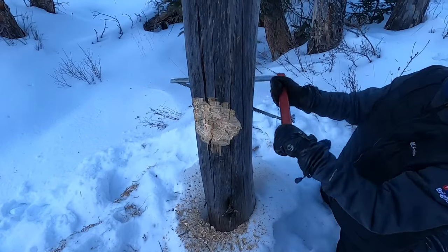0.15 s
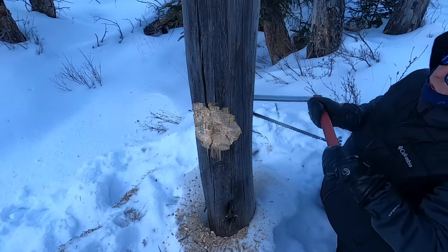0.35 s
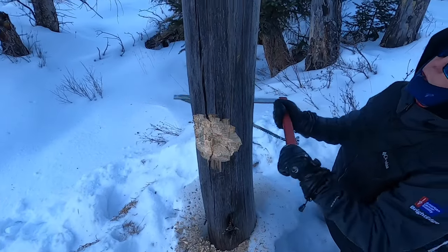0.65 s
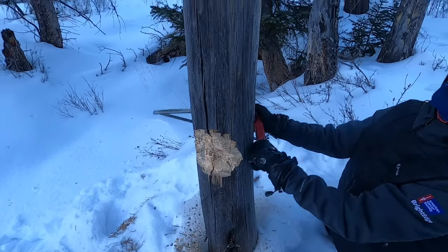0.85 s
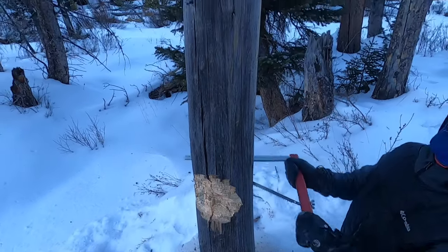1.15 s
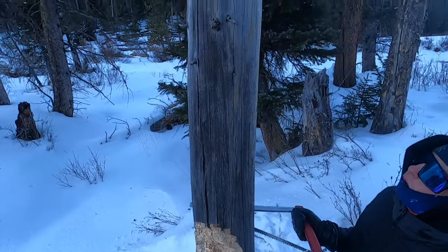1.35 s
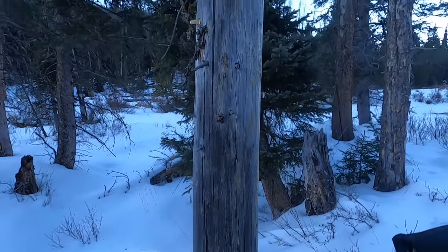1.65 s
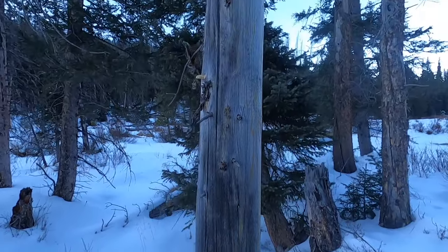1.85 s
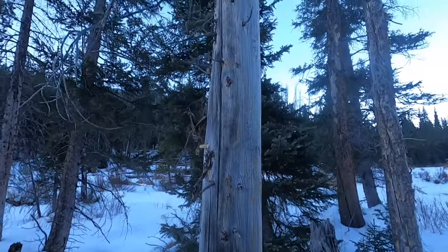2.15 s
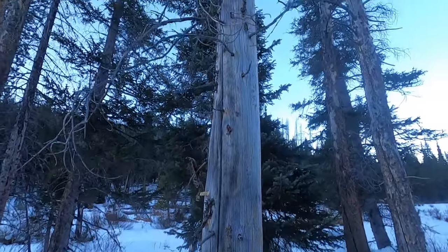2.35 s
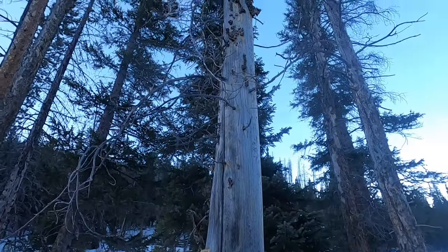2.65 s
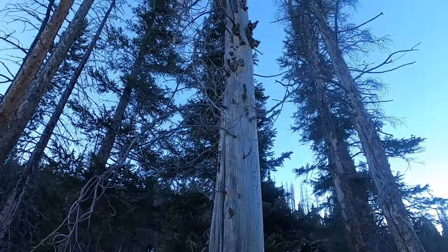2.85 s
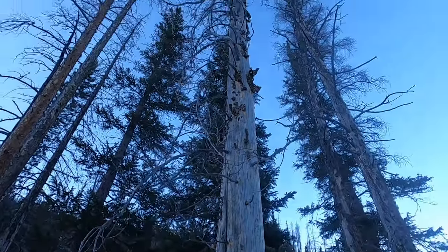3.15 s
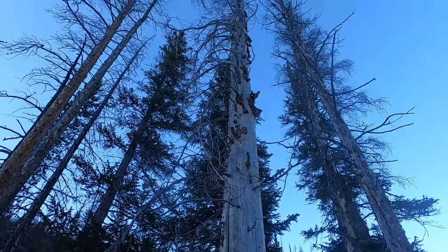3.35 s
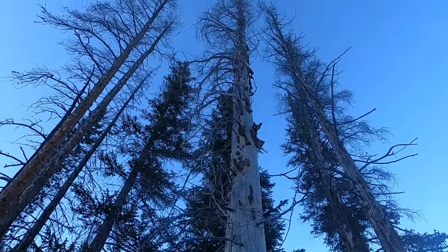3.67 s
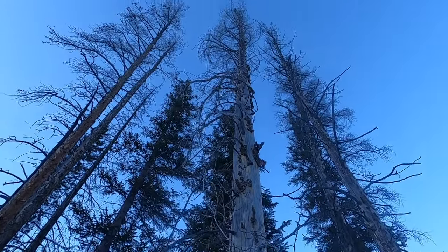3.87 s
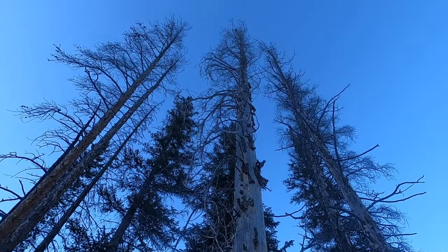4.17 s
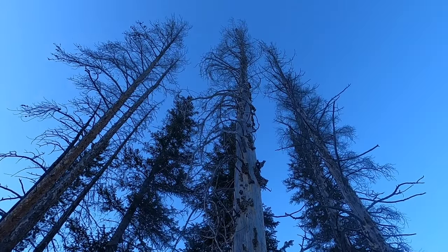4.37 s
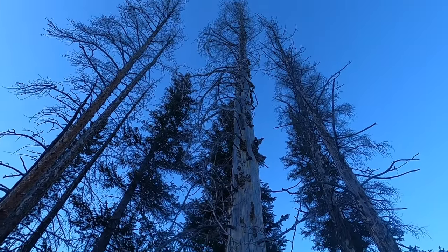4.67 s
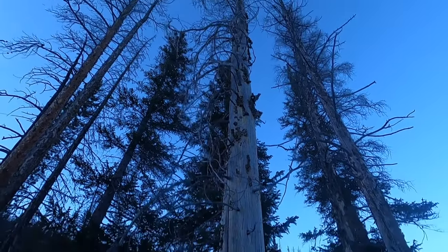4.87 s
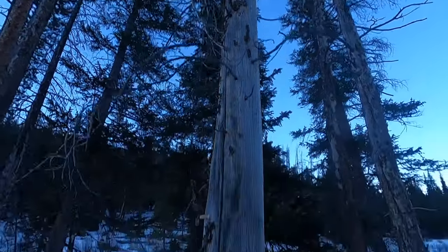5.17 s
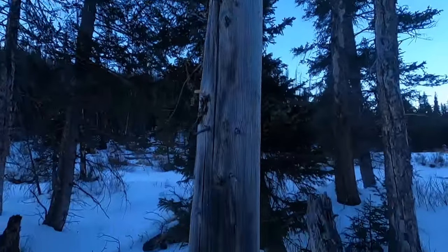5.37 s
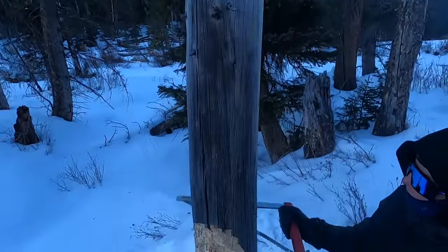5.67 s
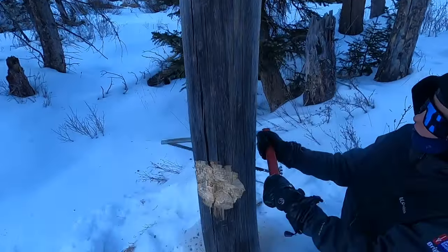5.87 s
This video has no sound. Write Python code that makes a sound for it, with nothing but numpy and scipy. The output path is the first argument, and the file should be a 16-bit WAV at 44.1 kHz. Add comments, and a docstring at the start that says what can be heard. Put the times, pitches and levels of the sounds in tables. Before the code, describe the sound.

Uneven back-and-forth sawing runs throughout, dry and gritty with a steely midrange edge. It is loudest in the first strokes, softer and duller through the middle, then strong again at the end. Short squeaks, splintering snaps, light ticks and trunk knocks break the rhythm. Close outdoor pickup, no obvious echo, faint forest noise and low rumble; nearly mono at first, then wider.

```python
"""A bow saw cuts a dry standing trunk in a quiet snowy forest, about two and a half strokes a second.
Close to the microphone, random fibre fractures make a dense rasp through resonances of blade, frame and trunk.
Chatter is noise around a pitch, the singing blade a wavering tone; snaps, knocks and ticks are noise bursts.
Behind lie low soft thumps of handling and trunk over a drifting rumble, and the forest's faint filtered noise.
The saw wanders across the stereo image, which starts almost mono and opens, top treble first."""
import sys
import numpy as np
from scipy import signal
from scipy.fft import rfft, irfft, next_fast_len
from scipy.io import wavfile
from scipy.ndimage import uniform_filter1d, map_coordinates

SR = 44100
rng = np.random.default_rng(int(sys.argv[2]) if len(sys.argv) > 2 else 0)


def waveform_to_disk(signal):
    """Save audio, clipped to [-1, 1], as 16-bit WAV at the path in sys.argv[1]."""
    frames = np.transpose(np.atleast_2d(signal))
    scaled = np.clip(frames, -1, 1) * 32767
    samples = np.round(scaled).astype(np.int16)
    wavfile.write(sys.argv[1], SR, samples)


N = 265219  # samples, about 6 s

# Pushes and pulls of the saw: start t/s, length/s, fastest moment/share of length,
# loss towards the slow ends/dB, rasp level/dB, bite, trunk and splinter hiss levels/dB re rasp,
# level of the idle scraping before it/dB
STROKES = [(0.099, 0.34, 0.58, 17, -33, -2.5, -13, -36, -58.5),
           (0.491, 0.46, 0.61, 19.5, -34.5, 0.5, -14.5, -20.5, -55.5),
           (1.037, 0.3, 0.59, 11, -40.0, 0.5, -21, -22.5, -61),
           (1.393, 0.35, 0.51, 14.5, -35.5, 0.5, -14.5, -23, -55.5),
           (1.826, 0.39, 0.5, 20.5, -39.5, 1, -11, -21.5, -52),
           (2.248, 0.36, 0.6, 8, -40.5, -1, -8, -22, -61),
           (2.678, 0.35, 0.46, 14.5, -43, -1.5, -5.5, -25.5, -59.5),
           (3.033, 0.39, 0.54, 19, -39, -0.5, -10, -27.0, -58),
           (3.477, 0.42, 0.48, 32, -39.5, -3, -9, -33, -63.5),
           (3.904, 0.47, 0.39, 13.5, -43.5, -4.5, -7.5, -36, -58),
           (4.378, 0.44, 0.48, 66, -41.5, -2, -12.5, -32, -68),
           (4.784, 0.33, 0.4, 6, -43.0, -1.0, -8, -28.5, -66.5),
           (5.186, 0.33, 0.54, 23.5, -40, 3.5, -16.5, -21.5, -58.5),
           (5.56, 0.38, 0.64, 12.5, -28, -2, -14.5, -25.5, -53)]
# The cut pinches the blade in mid-stroke: t/s, loss/dB, half length/s
STALLS = [(0.744, 15.68, 0.045), (1.602, 7.5, 0.023), (4.16, 9.5, 0.019), (5.792, 8.5, 0.086)]
# Spectra of rasp, keen bite, splinters and trunk: f/Hz, relative level/dB per Hz
RASP_SPECTRUM = [(500, -75), (900, -12.5), (1040, -7), (1130, 0), (1300, 2), (1500, 7), (2200, 2),
                 (2450, -20), (2900, -16), (4000, -66)]
BITE_SPECTRUM = [(1700, -56), (2200, 0), (2500, 2), (3000, -0.5), (3700, -3), (4800, -5), (5700, -14),
                 (6600, -7.5), (7600, -9), (8300, -29.5), (10000, -22), (13000, -66)]
SPLINTER_SPECTRUM = [(5000, 2), (8000, 12.5), (9300, 5), (10300, -1.5), (12500, 3), (15700, -17)]
TRUNK_SPECTRUM = [(40, -51), (90, -34), (125, -10), (155, 3.5), (210, 1.5), (320, 1.5), (410, -1.5),
                  (570, -0.5), (720, -6), (900, -12), (1200, -0.5), (2000, -49)]
# Resonances of the saw damped in the cut: f/Hz, width/Hz, relative level/dB
BLADE_MODES = [(1436, 30, -0.5), (1520, 117, 0), (1630, 46, -9), (1843, 24, 8), (2022, 36, 8.5),
               (2170, 26, 4), (2374, 28, 4)]
BLADE_HIGH_MODES = [(2560, 60, 11), (2700, 34, 21), (2915, 75, 17.5), (3157, 56, 15.5), (3340, 41, 15),
                    (3505, 70, 6), (4085, 47, 8), (4230, 68, -14), (6040, 58, -7), (6712, 65, -38.5),
                    (7140, 120, -32)]
FRAME_MODES = [(1138, 31, -0.72), (1150, 66, -1.5)]
# How well the steel radiates: f/Hz, level/dB
STEEL_RADIATION = [(800, 1), (1100, -8.5), (7600, -3.5), (9000, -10), (13000, -22.5)]
# The blade binds and chatters, in the steel (high) or against the trunk (low):
# t/s, f/Hz, level before trim/dB, half length/s
CHATTER = [(.32, 2120, -28, .012), (.84, 2360, -35.5, 0.033), (.986, 1570, -55, .022),
           (1.229, 2900, -29, .014), (1.267, 2780, -35.5, 0.0099), (1.651, 2650, -42, 0.012),
           (2.049, 2090, -39, .02), (2.36, 335, -48, 0.055), (2.487, 1490, -34, 0.013),
           (2.529, 282, -41, 0.035), (2.822, 1480, -43, 0.038), (3.62, 1490, -38, 0.0073),
           (3.698, 567, -44.5, .03), (3.824, 450, -44, 0.016), (4.105, 3660, -43, .009),
           (4.565, 1500, -38.5, 0.019), (4.602, 3360, -45.5, 0.027), (5.64, 3250, -32.5, 0.024),
           (5.696, 2690, -31, 0.029)]
# The taut blade is set singing: t/s, level/dB, swell/s, t60/s
TWANGS = [(0.0, -53, .01, .17), (.39, -44, .02, .2), (.61, -46, .07, .3), (.9, -48, .05, .2),
          (1.54, -45, .015, .2), (2.56, -55, .03, .2), (2.93, -47.5, .045, .6), (3.16, -48.5, .07, .45),
          (4.3, -58, .04, .2), (4.655, -47, .03, .5), (4.96, -50, .03, .3), (5.87, -50, .04, .3)]
# Sharp snaps where a tooth catches: t/s, level before trim/dB, treble level before trim/dB re the first
SNAPS = [(0.0316, -33.5, -37), (0.2705, -29, -32), (0.2876, -28, -29), (0.3117, -34, -32),
         (0.6318, -31, -8), (0.8423, -48, -29), (1.35, -40.5, -34), (1.5064, -39, -34),
         (1.6529, -22, -12.5), (3.6153, -27, -38), (3.9, -40.5, -35), (4.102, -32, -34), (4.1677, -37, -20),
         (5.7014, -48, -28)]
# Dull knocks against the trunk: t/s, level before trim/dB, thump level before trim/dB re the first
KNOCKS = [(0.383, -41.5, 1), (0.923, -37, -2), (1.512, -39, -12), (1.574, -30.5, -1.5), (1.751, -44, -6),
          (1.789, -33, -29), (2.648, -33.5, -21), (3.369, -35.5, -17), (3.813, -32, -16), (4.118, -29, -15),
          (5.059, -46.5, 5.5), (5.124, -46.5, 2.5), (5.774, -22.5, -11), (5.818, -34.5, 1)]
# Spectra of snap, knock, thump and light blade ticks: f/Hz, relative level/dB per Hz
SNAP_SPECTRUM = [(200, 5), (900, 8.5), (1200, 5), (2000, 7.5), (3500, 8), (6000, -14), (12000, -65)]
KNOCK_SPECTRUM = [(100, -32), (350, 6), (520, 7.5), (750, -7), (1200, 8), (1700, 5), (2500, -28),
                  (6000, -19), (15000, -65)]
THUMP_SPECTRUM = [(30, -25), (70, -30), (110, 7.5), (170, 13), (330, -0.5), (520, -8), (1200, -40),
                  (4000, -70)]
RATTLE_SPECTRUM = [(100, -25), (400, -8), (800, -12), (1400, 0), (2200, -4), (4000, -14), (7500, -26),
                   (14000, -60)]
# Low soft thumps of handling and of the trunk, many at stroke ends:
# t/s, level before trim/dB, half length/s
SOFT_THUMPS = [(0.385, -49, .025), (0.923, -49.5, 0.045), (1.54, -42, 0.041), (1.75, -59, 0.034),
               (2.88, -64, 0.035), (3.403, -51, 0.034), (5.416, -47.5, 0.13), (5.822, -55, 0.075)]
# Spectra of the low rumble with its thumps, and of the forest: f/Hz, relative level/dB per Hz
RUMBLE_SPECTRUM = [(15, -6), (30, 0.5), (50, -9), (75, -17.5), (120, -21), (400, -51.5)]
FOREST_SPECTRUM = [(25, -21), (60, -22), (100, -21), (180, 6), (500, -9), (1500, -27), (4000, -8),
                   (7500, -16.5), (9000, -33), (15500, -43)]
# How the saw faces the microphone: t/s, frame level before trim/dB, left-right level/dB, lag of left/ms
FACING = [(0, 1.5, -7, 0), (.9, 1.5, -2, 0.0098), (1.3, -9, -6, 0.0048), (2, -12, 7.5, 0),
          (2.7, -6, 4.5, 0), (3.7, -10, -1.5, 0.025), (4.9, -13, 0.5, 0.013), (5.25, -6, -2, 0.028),
          (5.8, -5.5, -3, 0.037)]
# Likeness of left and right before panning: f/Hz, correlation
LIKENESS = [(100, 1), (1200, 0.91), (2200, 0.91), (4300, 0.89), (5600, 0.65), (7500, 0.17), (10000, 0.18),
            (14000, 0.031)]
# Lean of the treble, to the right at the top: f/Hz, left-right level/dB
TREBLE_LEAN = [(1500, 2), (3000, 4.1), (7000, -0.5), (10500, 0), (13000, -4.5)]
# Width of the stereo image: t/s, share of the side signal below the split, share above it
STEREO_WIDTH = [(0, 0.0033, 0), (.4, 0.0067, 0), (.52, 0.0067, 0.78), (2.5, 0.017, 1), (2.7, 0.17, 0.66),
                (3.2, 0.25, 0.81), (3.5, 0.62, 0.79), (6, 1, 0.9)]

GRIP_S, RELEASE_S = 0.079, 0.062  # the teeth take hold and let go
TRUNK_POWER = 0.79  # the trunk follows this power of the stroke's force
IDLE_BITE_DB, IDLE_TRUNK_DB, IDLE_HISS_DB = -5, -3, -23.5  # re the idle rasp
PATCHY_DB = 2.6  # rms depth of the passing resonances
CALM_DB, DRIFT_DB = -67, 6.5  # rumble between thumps before trim, and the scale of its drift
SPLIT_HZ, TOP_HZ = 11700, 15730  # split of the stereo width, and the upper band limit


def sawing(blade_db=-4, high_db=-5.5, frame_db=-8.0, rasp_db=-3.5, bite_db=-1, trunk_db=0.5,
           hiss_db=5.5, judder_db=0.05, drum_db=0.6):
    """The teeth tear fibres; blade, frame and trunk each answer with their own resonances."""
    rasp_gain, bite_gain, trunk_gain, hiss_gain = strokes()
    facing_frame_db, _, _ = curves(FACING)
    # teeth catch and break free unevenly
    snags = 1 + .55 * catches(rate=80, t60=.013, scatter_db=2)
    judder = unit(snags * amp(judder_db * wobble(330)))

    coarse = fibres(rate=10000, scatter_db=1.0)
    keen = fibres(rate=16000, scatter_db=0.0)
    steel = fibres(rate=12000, scatter_db=4.0)
    # two passes give the frame's ring a firm lower edge
    frame = resonated(resonated(steel, FRAME_MODES), FRAME_MODES)

    rasp = amp(rasp_db) * coloured(coarse, RASP_SPECTRUM)
    rasp = rasp + amp(blade_db) * resonated(steel, BLADE_MODES)
    rasp = rasp + amp(frame_db + facing_frame_db) * frame
    bite = amp(bite_db) * coloured(keen, BITE_SPECTRUM)
    bite = bite + amp(high_db) * resonated(steel, BLADE_HIGH_MODES)
    wood = coloured(fibres(rate=4000, scatter_db=0.0), TRUNK_SPECTRUM)
    drumming = amp(trunk_db) * unit(wood * amp(drum_db * wobble(70)))
    splinters = amp(hiss_db) * coloured(fibres(rate=18000, scatter_db=2.0), SPLINTER_SPECTRUM)
    return judder * (rasp_gain * rasp + bite_gain * bite + trunk_gain * drumming + hiss_gain * splinters)


def strokes(unsteady_db=1.0):
    """Gains of rasp, bite, trunk and hiss: teeth grip, swell with speed and let go, over idle scraping."""
    t = np.arange(N) / SR
    free = amp(-sum(db * swell(s, half) for s, db, half in STALLS))
    gains = np.zeros((4, N))
    for start, length, fastest, sag_db, db, bite_db, trunk_db, hiss_db, _ in STROKES:
        now = (t > start) & (t < start + length)
        age = t[now] - start
        slowness = np.interp(age, [0, fastest * length, length], [1, 0, 1]) ** 2
        grip = np.minimum(age / GRIP_S, 1)
        release = np.minimum((length - age) / RELEASE_S, 1)
        force = grip * release * amp(-sag_db * slowness)
        teeth = free[now] * force
        trunk = amp(trunk_db) * np.abs(force) ** TRUNK_POWER
        gains[:, now] += amp(db) * np.array([teeth, amp(bite_db) * teeth, trunk, amp(hiss_db) * teeth])
    starts, *_, idle_db = np.transpose(STROKES)
    idle_colour = amp([0, IDLE_BITE_DB, IDLE_TRUNK_DB, IDLE_HISS_DB])
    idle = np.outer(idle_colour, amp(np.interp(t, starts, idle_db)))
    return np.hypot(gains, idle) * amp(unsteady_db * wobble(30))


def fibres(rate, scatter_db):
    """Tiny fractures, rate a second, of random size; narrow resonances pass as the blade slides."""
    happens = rng.random((2, N)) < rate / SR
    size = rng.standard_normal((2, N)) * amp(scatter_db * rng.standard_normal((2, N)))
    z = signal.stft(happens * size, nperseg=2048)[2]
    # random gains smoothed over frequency, then over time
    field = uniform_filter1d(rng.standard_normal(z.shape[1:]), size=3, axis=0)
    field = uniform_filter1d(field, size=7, axis=1)
    patchy = signal.istft(z * amp(PATCHY_DB * unit(field)), nperseg=2048)[1]
    return unit(patchy[:, :N])


def catches(rate, t60, scatter_db):
    """Brief surges at random moments as single teeth snag and tear free; each peaks near 1."""
    size = amp(scatter_db * np.clip(rng.standard_normal(N), -2, 2))
    kicks = (rng.random(N) < rate / SR) * size
    t = np.arange(SR // 20) / SR
    fall = amp(-60 * t / t60) * np.minimum(t / .0003, 1)
    return signal.fftconvolve(kicks, fall)[:N]


def chatter(level_db=-2):
    """Stick and slip, drawn as noise around one rough pitch that swells and fades."""
    t = np.arange(N) / SR
    out = np.zeros(N)
    for s, hz, db, half in CHATTER:
        near = np.abs(t - s) < 3 * half
        width = 70 + .045 * hz  # Hz either side of the pitch
        band = signal.butter(N=2, Wn=[hz - width, hz + width], btype="band", fs=SR, output="sos")
        scrape = unit(signal.sosfilt(band, rng.standard_normal(near.sum())))
        out[near] += amp(db + level_db) * swell(s, half)[near] * scrape
    return out


def singing(note_hz=1841):
    """The taut blade swells on one note and rings on; the cut makes it waver."""
    t = np.arange(N) / SR
    notes = []
    for s, db, rise, t60 in TWANGS:
        ring = amp(-60 * np.abs(t - s) / t60)
        notes.append(amp(db) * np.where(t < s, swell(s, rise), ring))
    pitch_hz = note_hz + 4.5 * wobble(9)
    phase = 2 * np.pi * np.cumsum(pitch_hz) / SR + .42 * wobble(60)
    tone = unit(np.sin(phase) * amp(2.2 * wobble(45)))
    return np.linalg.norm(notes, axis=0) * tone


def snaps(snap_db=-7, tick_db=-1):
    """A tooth catches and breaks off a larger splinter: a snap with a treble tick."""
    s, db, treble = np.transpose(SNAPS)
    body = blows(s, db + snap_db, SNAP_SPECTRUM, t60=.02)
    return body + blows(s, db + treble + tick_db, SPLINTER_SPECTRUM, t60=.02)


def knocks(knock_db=-9, thump_db=-2):
    """The saw jolts in the cut and thumps the trunk, whose bass dies more slowly."""
    s, db, low = np.transpose(KNOCKS)
    knock = blows(s, db + knock_db, KNOCK_SPECTRUM, t60=0.029)
    return knock + blows(s, db + low + thump_db, THUMP_SPECTRUM, t60=0.11)


def blows(times, levels_db, spectrum, t60, onset=0.0038):
    """Noise bursts: each rises over a few milliseconds (onset, s), then dies away at once."""
    t = np.arange(SR // 4) / SR
    burst = amp(-60 * np.maximum(t - onset, 0) / t60) * np.minimum(t / onset, 1) ** 2
    shape = np.zeros(N + SR)
    for s, db in zip(times, levels_db):
        shape[max(0, round(s * SR)):][:len(t)] += amp(db) * burst
    return shape[:N] * coloured(rng.standard_normal((2, N)), spectrum)


def rattle(level_db=-60):
    """The blade ticks lightly in the cut at random moments, all through."""
    ticks = catches(rate=25, t60=.025, scatter_db=2)
    return amp(level_db) * ticks * coloured(rng.standard_normal((2, N)), RATTLE_SPECTRUM)


def rumble(level_db=-1):
    """Low soft thumps of handling and trunk swell over a drifting rumble, unlike in left and right."""
    thumps = sum(amp(db) * swell(s, half) for s, db, half in SOFT_THUMPS)
    level = amp(CALM_DB + DRIFT_DB * wobble(6.7)) + thumps
    noise = rng.standard_normal(N) + 3.3 * rng.standard_normal((2, N))  # shared + separate
    return amp(level_db) * level * coloured(noise, RUMBLE_SPECTRUM)


def forest(level_db=-66):
    """The forest's faint, steady rush: filtered noise, alike in the bass."""
    return amp(level_db) * coloured(spread(rng.standard_normal((2, N))), FOREST_SPECTRUM)


def amp(db):
    """Decibels to gain."""
    return 10 ** (np.asarray(db) / 20)


def unit(x):
    """Scaled to rms 1."""
    return x / np.sqrt(np.mean(x ** 2) + 1e-20)


def along(points, hz):
    """(Hz, value) points read on a log frequency axis."""
    f, v = np.transpose(points)
    return np.interp(np.log(hz + 1), np.log(f + 1), v)


def curves(rows):
    """One value per sample for each column after the time."""
    s, *cols = np.transpose(rows)
    return [np.interp(np.arange(N) / SR, s, c) for c in cols]


def wobble(rate):
    """A smooth random curve, rate knots a second."""
    knots = rng.standard_normal(int(N * rate / SR) + 4)
    return map_coordinates(knots, [np.arange(N) * rate / SR])


def swell(s, half):
    """A bell-shaped rise and fall that peaks at 1; half is its standard deviation in seconds."""
    return np.exp(-((np.arange(N) / SR - s) / half) ** 2 / 2)


def filtered(x, response):
    """x times a real or complex response of frequency."""
    m = next_fast_len(N + SR // 2)
    return irfft(rfft(x, m) * response(np.fft.rfftfreq(m, 1 / SR)), m)[..., :N]


def coloured(x, spectrum):
    """x with a broad spectrum, at rms 1."""
    return unit(filtered(x, lambda hz: amp(along(spectrum, hz))))


def resonated(x, modes):
    """x through steel resonances, at rms 1; the radiation curve then weakens the top treble."""
    def ring(f):
        return sum(amp(db) * 1j * f * w / (c * c - f * f + 1j * f * w) for c, w, db in modes)
    return coloured(filtered(x, ring), STEEL_RADIATION)


def spread(pair):
    """Two unrelated signals become left and right: alike in the bass, apart in the treble."""
    def mid_side_gains(hz):
        turn = np.arccos(np.clip(along(LIKENESS, hz), -1, 1)) / 2
        return np.array([np.cos(turn), np.sin(turn)])
    mid, side = filtered(pair, mid_side_gains)
    return np.array([mid + side, mid - side])


def scene():
    """The saw moves across the microphone, its top treble favouring the right, over the background."""
    _, pan_db, lag_ms = curves(FACING)
    saw = spread(sawing() + rattle() + knocks() + snaps()) + singing() + chatter()
    left, right = saw * amp(np.array([pan_db, -pan_db]) / 2)
    left = map_coordinates(left, [np.arange(N) - lag_ms * SR / 1000])

    def lean(hz):
        return amp(np.outer([1, -1], along(TREBLE_LEAN, hz)) / 2)
    return filtered(np.array([left, right]), lean) + rumble() + forest()


def record(dry):
    """The image starts almost mono and opens, top treble first; nothing is kept above the band limit."""
    mid, side = (dry[0] + dry[1]) / 2, (dry[0] - dry[1]) / 2
    low_share, top_share = np.clip(curves(STEREO_WIDTH), 0, 1)
    low = filtered(side, lambda hz: hz < SPLIT_HZ)
    side = low_share * low + top_share * (side - low)
    return filtered(np.array([mid + side, mid - side]), lambda hz: hz < TOP_HZ)


dry = scene()
out = record(dry)
waveform_to_disk(out)
```